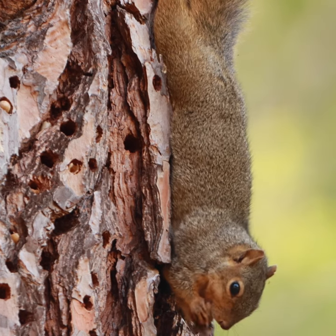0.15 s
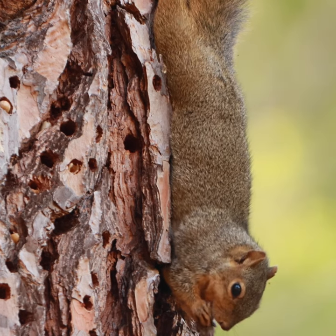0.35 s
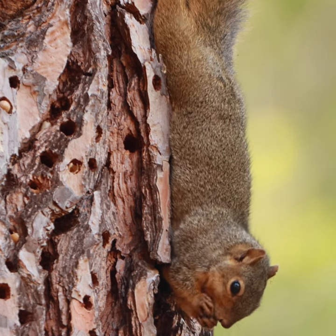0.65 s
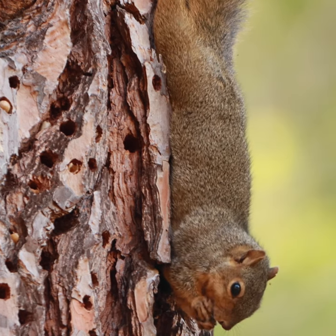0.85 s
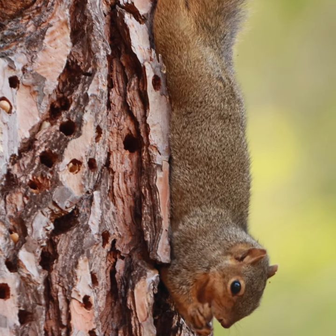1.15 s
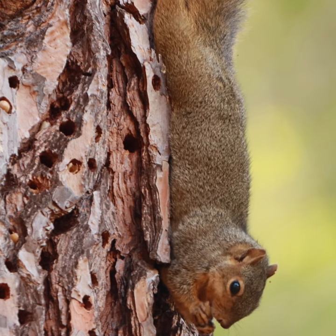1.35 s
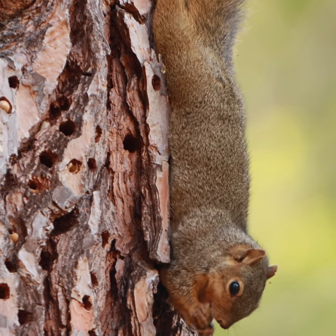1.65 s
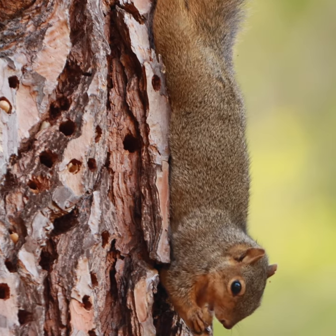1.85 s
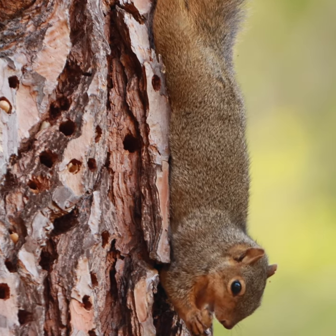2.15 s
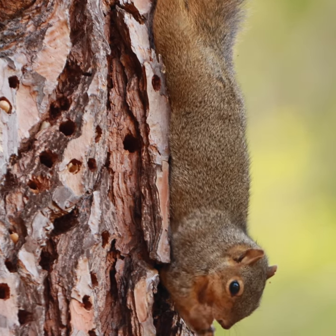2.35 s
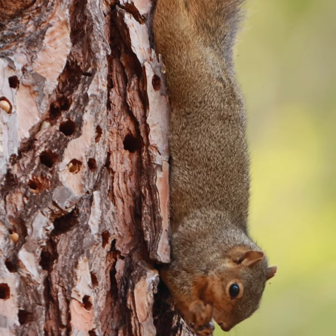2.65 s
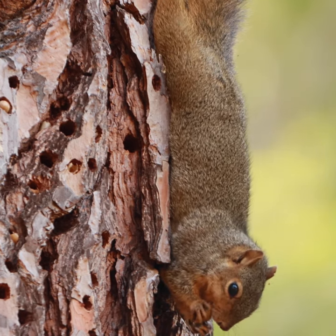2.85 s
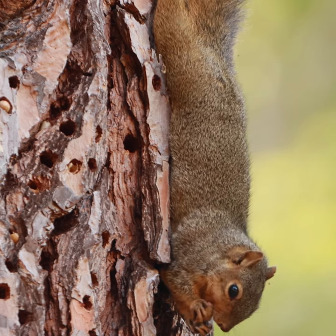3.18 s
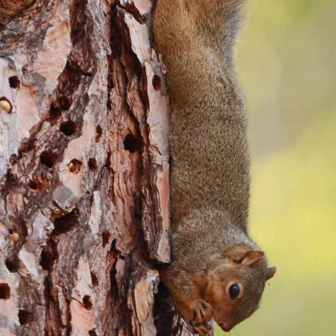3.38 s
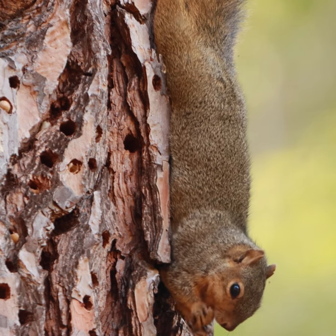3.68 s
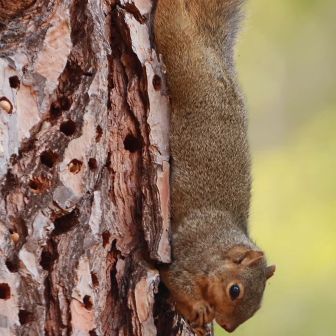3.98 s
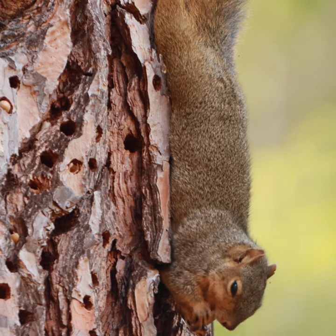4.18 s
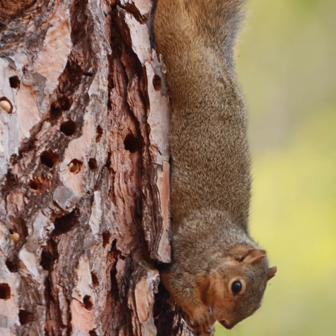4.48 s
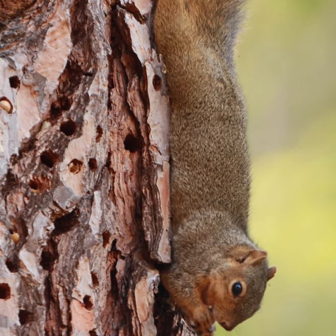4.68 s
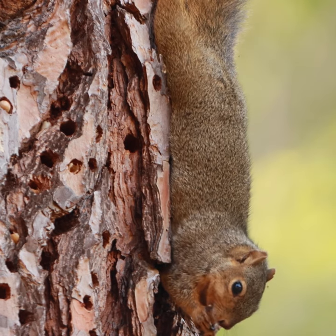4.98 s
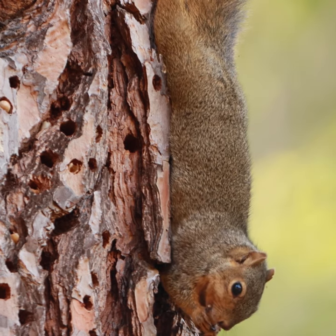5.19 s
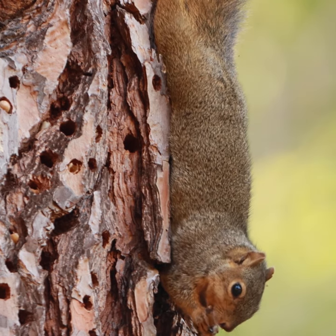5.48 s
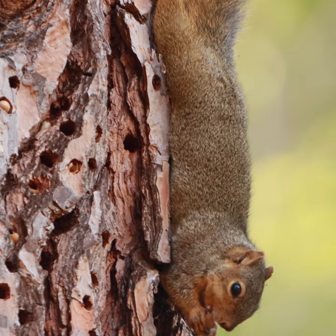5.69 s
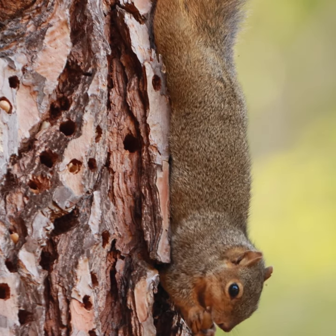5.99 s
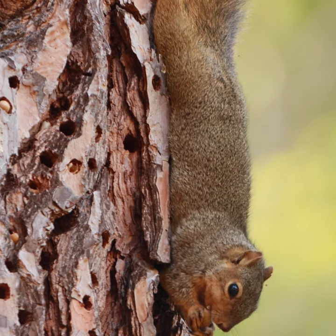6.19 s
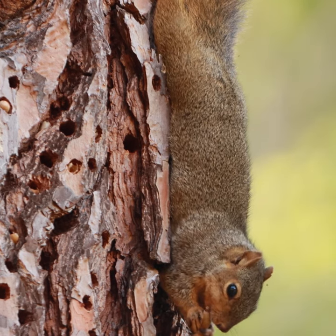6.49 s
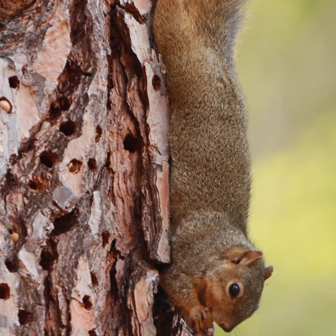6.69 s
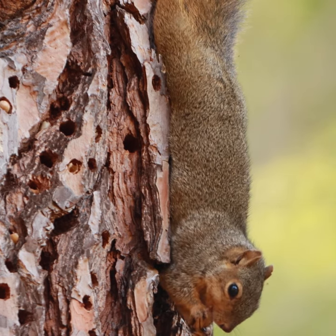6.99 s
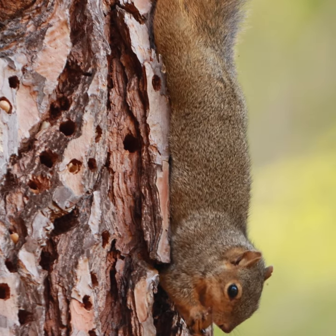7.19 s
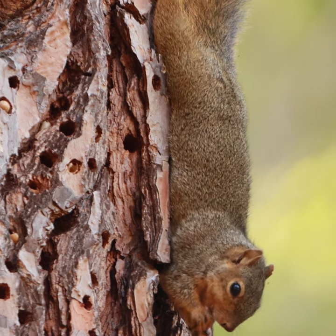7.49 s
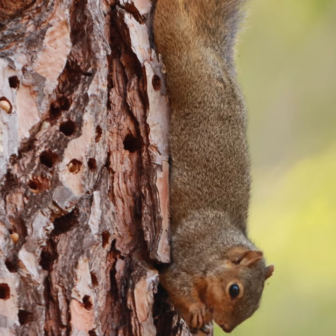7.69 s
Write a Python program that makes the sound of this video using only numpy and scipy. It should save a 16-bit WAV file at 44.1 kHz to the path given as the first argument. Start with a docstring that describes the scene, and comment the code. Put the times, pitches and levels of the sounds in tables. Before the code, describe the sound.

A soft distant rumble, slowly swelling, and a light hiss of air last the whole eight seconds. A cricket makes faint, high, pure-toned triple-pulse chirps at 0.1-0.4 s, steadily from 0.65 to 2.8 s, once at 4.5 s and again from 5.75 to 6.5 s. A far woodpecker gives gentle echoing churrs, runs of seven reedy notes rising then sinking, around 0.9, 1.8, 3.1, 4.3 and 5.5 s, the later four followed by quick double notes. A near woodpecker, far louder, scolds at 3.4-3.7 s, then at 4.6, 5.05 and 5.35 s, and finally at 6.8-7.1 s: harsh, fast-trilled, climbing churrs with short raspy yelps around them and woodland reverberation. Faint dry bark ticks fall at 4.05 s and scattered from 6 to 7.5 s; one short dull knock sounds at 6.25 s. The end settles into rumble and air.

```python
"""A cricket chirps faintly in bouts of pure-tone wing strokes over a low far rumble and a hiss of air.
From about 1 s a far woodpecker gives slow churrs, each an arched run of reedy notes in echo.
From 3.4 s a near one scolds: five harsh rolling churrs, reedy harmonics that climb while they trill,
with short yelps around them. From 4 s a few noise-burst ticks of bark fall; at 6.2 s a dull knock,
a quickly damped sine, sounds once."""
import sys
import numpy as np
from scipy import signal
from scipy.fft import rfft, irfft, next_fast_len
from scipy.io import wavfile

SR = 44100
rng = np.random.default_rng(int(sys.argv[2]) if len(sys.argv) > 2 else 0)


def master_out(mix):
    """Clip the mix to full scale and print it as 16-bit PCM to the path in sys.argv[1]."""
    frames = np.transpose(np.atleast_2d(mix))
    ceiling = np.clip(frames, -1, 1)
    pcm = np.round(ceiling * 32767).astype(np.int16)
    wavfile.write(sys.argv[1], SR, pcm)


N = 345744
TIME = np.arange(N) / SR
CUTOFF_HZ = 15600


def from_db(db):
    """Amplitude factor of a level in dB."""
    return 10 ** (np.asarray(db) / 20)


def rms_one(x):
    """Scale to rms 1."""
    return x / np.sqrt(np.mean(x ** 2) + 1e-20)


def in_time(rows, t):
    """Each column of a curve, interpolated at times t."""
    s, *columns = np.transpose(rows)
    return [np.interp(t, s, column) for column in columns]


def at_hz(points, hz, axis=1):
    """One column of a spectrum, interpolated over log frequency."""
    points = np.array(points)
    return np.interp(np.log(np.maximum(hz, 1)), np.log(points[:, 0]), points[:, axis])


def shaped(x, response):
    """Filter x by a response given as a function of frequency."""
    size = next_fast_len(x.shape[-1] + SR // 10)
    hz = np.arange(size // 2 + 1) * SR / size
    return irfft(rfft(x, size) * response(hz), size)[..., :x.shape[-1]]


def coloured(x, spectrum):
    """Filter x by a table of f/Hz, level/dB."""
    return shaped(x, lambda hz: from_db(at_hz(spectrum, hz)))


def wobble(size, rate_hz):
    """Random wavering up to about rate_hz; rms 1."""
    return rms_one(shaped(rng.standard_normal(size), lambda hz: 1 / (1 + (hz / rate_hz) ** 2)))


def add(track, t, sound):
    """Mix a sound into a track from time t[0] on."""
    start = int(round(t[0] * SR))
    track[start:start + len(sound)] += sound[:N - start]


def near_bird():
    """Churrs and yelps pass through the same throat and bill and echo among the trees."""
    # throat and bill resonances: f/Hz, relative level/dB
    throat_spectrum = [(700, -22.5), (1000, -13.5), (1450, -5), (1800, 0), (2200, 3.5), (2850, -5),
                       (3600, 3), (4200, -15), (4800, -17.5), (5700, -12), (6900, -24), (8300, -27.5),
                       (9900, -40.5), (11500, -23), (12700, -29.5), (14200, -45)]
    # churrs: start/s, summit/s, end/s, start pitch/Hz, summit pitch/Hz, level/dB, trill rate/Hz,
    # full trill pitch swing/share, trill loudness swing/dB, summit roughness/0-1,
    # summit bill opening/dB, third-harmonic lift/dB
    churr_rows = [(3.45, 3.561, 3.606, 654.5, 716, -30.5, 35.5, 0.051, 2.5, .03, -6.5, 1.5),
                  (4.634, 4.801, 4.928, 600, 922.5, -27, 37, 0.0644, 1, 0.15, 7.5, 2.5),
                  (5.06, 5.149, 5.195, 662.5, 776.5, -27, 37.3, 0.061, 2.6, 0.03, -0.5, 3),
                  (5.354, 5.446, 5.527, 648.4, 754, -28.5, 36.5, 0.076, 3, 0.1, -1, 2),
                  (6.796, 6.989, 7.083, 606.5, 882, -29, 37.4, 0.078, 1.5, 0.19, 3.5, 4.5)]
    # yelps leading into or trailing a churr: middle/s, length/s, top pitch/Hz, level/dB,
    # roughness/0-1, bill opening/dB
    yelp_rows = [(3.398, 0.061, 634, -37, 0.54, -6.5), (3.437, 0.04, 610, -34.5, 0.5, -6),
                 (3.621, 0.039, 680, -33.5, 0.46, 2.5), (3.651, .032, 695, -34.5, 0.53, 1),
                 (3.685, 0.033, 680, -42, .5, -1), (4.613, 0.05, 596, -33, 0.13, -12),
                 (5.041, .034, 625, -29.5, 0.38, -11), (5.21, 0.041, 751, -33, 0.7, 0.5),
                 (5.34, 0.04, 665, -31.5, 0.56, -4.5), (6.767, 0.044, 602, -32, 0.15, -12)]
    # t/s, echo send level/dB, top treble gain/dB
    echo_and_treble = [(3.4, -13.5, -1), (3.65, -14.5, 8.5), (4.62, -20, -7.5), (4.76, -11.5, 6.5),
                       (4.9, -15, 1), (5.1, -14.5, -3), (5.43, -15, 6.5), (5.53, -13.5, 4),
                       (6.82, -12.5, -7), (6.95, -16.5, 0), (7.06, -10.5, -4)]
    direct, sent = np.zeros(N), np.zeros(N)
    calls = [churr(*row) for row in churr_rows] + [yelp(*row) for row in yelp_rows]
    for t, pitch_hz, loudness, rough, open_db, third_db in calls:
        echo_db, treble_db = in_time(echo_and_treble, t)
        voice = syrinx(pitch_hz, np.clip(rough, 0, 1), throat_spectrum, third_db)
        call = loudness * bill(voice, open_db, treble_db)
        add(direct, t, call)
        add(sent, t, call * from_db(echo_db))
    return from_the_side(direct + trees(sent))


def churr(start, summit, end, start_hz, top_hz, db, rate_hz, swing, throb_db, top_rough, top_open_db,
          third_db, end_hz=671, loud_lag_s=0.0058, arch=0.064, unevenness=0.00803,
          trill_from_hz=520, trill_full_hz=760, edge_s=0.0041):
    """One trilled pitch arch: times, pitch, loudness, roughness, bill opening, third harmonic."""
    rise_power, fall_power = 1.9, 2.7  # higher: flatter summit
    start_db, end_db, fade_power = -5, -4, 5.6  # relative to the summit
    start_rough, end_rough = 0.08, 0.16
    bill_db_per_hz = 0.045
    t = TIME[int(start * SR):int(end * SR)]
    before = np.clip((summit - t) / (summit - start), 0, 1)
    after = np.clip((t - summit) / (end - summit), 0, 1)

    rise = (start_hz - top_hz) * before ** rise_power
    fall = (end_hz - top_hz) * after ** fall_power
    arch_hz = top_hz + rise + fall
    level_db = db + start_db * before ** fade_power + end_db * after ** fade_power
    rough = top_rough + (start_rough - top_rough) * before + (end_rough - top_rough) * after ** 2
    open_db = top_open_db - bill_db_per_hz * (top_hz - arch_hz)

    turn = 2 * np.pi * rate_hz * (t - summit)
    trill = np.cos(turn) - arch * np.cos(2 * turn)  # round crests, sharp troughs
    # the trill widens as the voice climbs
    effort = np.clip((arch_hz - trill_from_hz) / (trill_full_hz - trill_from_hz), 0, 1)
    pitch_hz = arch_hz * (1 + effort * swing * trill + unevenness * wobble(len(t), 62))
    throb = throb_db * np.cos(turn - 2 * np.pi * rate_hz * loud_lag_s)
    edges = np.minimum(1, np.minimum(t - t[0], t[-1] - t) / edge_s)  # soft start and stop
    return t, pitch_hz, from_db(level_db + throb) * edges, rough, open_db, third_db


def yelp(s, length_s, top_hz, db, rough, open_db, third_db=-2, droop=0.1746):
    """One short arched note, lower by the share droop at both ends; same controls as a churr."""
    t = TIME[int((s - length_s / 2) * SR):int((s + length_s / 2) * SR)]
    away = np.linspace(-1, 1, len(t)) ** 2
    return t, top_hz * (1 - droop * away), from_db(db) * (1 - away), rough, open_db, third_db


def syrinx(pitch_hz, rough, throat, third_db=0, jitter=0.0044, rough_jitter=0.0484, jitter_hz=450,
           shimmer=0.59, rasp=1.0, flutter_db=2, flutter_hz=70, air_db=-23, air_hz=7000):
    """Reedy harmonics shaped by the throat; roughness shakes the cycles and adds pulsed rasp."""
    size = len(pitch_hz)
    shaky_hz = pitch_hz * (1 + (jitter + rough_jitter * rough) * wobble(size, jitter_hz))
    phase = 2 * np.pi * np.cumsum(shaky_hz) / SR

    k = np.arange(1, 25)[:, None]  # harmonic numbers
    flutter = flutter_db * wobble((len(k), size), flutter_hz)  # each harmonic wavers by itself
    gains = from_db(at_hz(throat, k * pitch_hz) + flutter + third_db * (k == 3))
    gains = gains * (k * pitch_hz < CUTOFF_HZ)
    harmonics = gains * np.sin(k * phase + rng.uniform(0, 2 * np.pi, k.shape))
    tone = harmonics.sum(0) / np.sqrt((gains ** 2).sum(0) / 2)
    tone = tone * (1 + shimmer * rough * wobble(size, jitter_hz))

    pulsed_noise = rng.standard_normal(size) * (1 + np.cos(phase))
    hiss = rms_one(coloured(pulsed_noise, throat))
    # a fine rasp rides on top even of clear notes
    fine = rms_one(shaped(hiss, lambda hz: 1 - 1 / (1 + (hz / air_hz) ** 8)))
    voice = (tone + rasp * rough * hiss) / np.sqrt(1 + (rasp * rough) ** 2)
    return voice + from_db(air_db) * fine


def bill(voice, open_db, treble_db, bill_hz=3690, width_hz=620, treble_hz=9600):
    """The bill's opening sets the upper resonance, its direction the top treble."""
    upper = shaped(voice, lambda hz: np.exp(-((hz - bill_hz) / width_hz) ** 2))
    treble = shaped(voice, lambda hz: 1 - 1 / (1 + (hz / treble_hz) ** 10))
    return voice + (from_db(open_db) - 1) * upper + (from_db(treble_db) - 1) * treble


def trees(x, early_s=0.017, late_db=-2, t60_s=0.61, first_s=0.0065, alike=0.36):
    """Near trunks give separate quick echoes, the wood behind them a diffuse tail."""
    # colour of the echo: f/Hz, gain/dB
    echo_colour = [(700, 7), (2200, 3.5), (2900, 2), (3600, 5.5), (4500, 6.5), (5700, 8), (9000, 10),
                   (12000, 1.5)]
    t = TIME[:SR]
    hits = rng.standard_normal((3, SR)) * (rng.random(SR) < 900 / SR)  # about 900 per s
    trunks = hits * np.exp(-t / early_s) * (t > first_s)
    wood = rng.standard_normal((3, SR)) * from_db(-60 * t / t60_s) * (1 - np.exp(-t / early_s))
    paths = (rms_one(trunks) + from_db(late_db) * rms_one(wood)) / np.sqrt(SR)
    # one path common to both sides, one for each
    paths = np.sqrt(alike) * paths[0] + np.sqrt(1 - alike) * paths[1:]
    return signal.fftconvolve(np.atleast_2d(x), coloured(paths, echo_colour), axes=1)[:, :N]


def from_the_side(x):
    """Sound from the birds' side reaches the left port a little later, with its own colour."""
    # port differences: f/Hz, left phase lag/rad, left-right level/dB
    port_rows = [(800, 0.47, 2), (1630, 0.73, -0.5), (2100, 0.45, -1.5), (3070, 0.76, 5), (3760, 1.99, 1.5),
                 (6200, 2.08, 1.5), (8160, 4.7, 1.5), (12200, 6.3, -1)]

    def ports(hz):
        half_gain = from_db(at_hz(port_rows, hz, axis=2) / 2)
        half = half_gain * np.exp(-0.5j * at_hz(port_rows, hz))
        return np.array([half, 1 / half])
    return shaped(x, ports)


def far_bird(level_db=2, half_s=0.015, droop=0.251, rough=0.04, echo_db=-7,
             third_db_per_hz=0.07, third_from_hz=780):
    """Slower churrs of separate notes, each an arch of pitch, with the echoes of the wood."""
    # voice after the way through the trees: f/Hz, relative level/dB
    far_throat = [(800, -20.5), (1300, -1), (1650, 0.5), (2200, 4.5), (2700, -11), (3100, 2.5), (3500, 2.5),
                  (4000, -11), (5600, -21), (8000, -46), (14000, -71)]
    out = np.zeros(N)
    for s, top_hz, db in far_notes():
        t = TIME[int((s - half_s) * SR):int((s + half_s) * SR)]
        away = np.linspace(-1, 1, len(t)) ** 2
        third_db = third_db_per_hz * max(0, third_from_hz - top_hz)  # stronger in low notes
        voice = syrinx(top_hz * (1 - droop * away), rough, far_throat, third_db)
        add(out, t, from_db(db + level_db) * np.sqrt(1 - away) * voice)
    return from_the_side(out + from_db(echo_db) * trees(out, early_s=0.051, late_db=-2, t60_s=0.73))


def far_notes(note_count=7, uneven_db=1.7, lead_s=0.014, summit=0.62, sag=0.62, fade_db=-18):
    """Notes as (s, top pitch Hz, relative dB): runs that climb, swell and sink, then level pairs."""
    # churrs: middle note/s, note spacing/s, summit pitch/Hz, relative level/dB
    far_churrs = [(.933, 0.037, 853, -51), (1.845, 0.035, 889, -49), (3.078, .0337, 897, -48.5),
                  (4.322, .0353, 893, -50), (5.492, 0.046, 905, -49)]
    # double notes after a churr: t/s, spacing/s, top pitch/Hz, relative level/dB
    far_pairs = [(2.07, .043, 780, -53.5), (3.303, .034, 800, -54.5), (4.533, 0.05, 781, -51),
                 (5.696, 0.047, 825, -51.5)]
    notes = []
    for middle, gap, top_hz, db in far_churrs:
        for k in range(note_count):
            away = (k / (note_count - 1) - summit) ** 2  # summit as a share of the run
            s = middle + (k - note_count // 2) * gap - lead_s * (k == 0)  # first note stands apart
            note_db = db + fade_db * away + uneven_db * rng.standard_normal()
            notes.append((s, top_hz * (1 - sag * away), note_db))
    pairs = [(s + k * gap, top_hz, db) for s, gap, top_hz, db in far_pairs for k in range(2)]
    return notes + pairs


def cricket(pitch_hz=4080, stroke_count=3, stroke_s=0.021, half_s=0.0074, sag=0.008, growth_db=1.7,
            climb_hz=12, uneven_hz=14, uneven_db=0.6, echo_db=-18):
    """Chirps of short sagging pure tones, one a wing stroke, on average rising in level and pitch."""
    # bouts: start/s, chirp count, chirp spacing/s, first-stroke level/dB
    bouts = [(.125, 2, .248, -56), (.652, 10, .2346, -54.5), (4.503, 1, .23, -54.5), (5.75, 4, .219, -54)]
    out = np.zeros(N)
    chirps = [(s + i * gap, db) for s, count, gap, db in bouts for i in range(int(round(count)))]
    for s, db in chirps:
        for k, (off_pitch, off_level) in enumerate(rng.standard_normal((stroke_count, 2))):
            middle = s + k * stroke_s
            t = TIME[int((middle - half_s) * SR):int((middle + half_s) * SR)]
            along = np.linspace(-1, 1, len(t))
            stroke_hz = (pitch_hz + climb_hz * k + uneven_hz * off_pitch) * (1 - sag * along)
            tone = np.sin(2 * np.pi * np.cumsum(stroke_hz) / SR)
            level = from_db(db + growth_db * k + uneven_db * off_level)
            add(out, t, level * np.cos(along * np.pi / 2) * tone)
    return out + from_db(echo_db) * trees(out)


def knock(start_s=6.247, level_db=-16, ring_hz=680, t60_s=0.003, soft_hz=1100):
    """One damped sine, dead within a few cycles and dulled by a low-pass."""
    t = np.maximum(TIME - start_s, 0)
    decay_db = np.minimum(60 * t / t60_s, 200)
    ring = -np.sin(2 * np.pi * ring_hz * t) * from_db(level_db - decay_db)
    return signal.sosfilt(signal.butter(4, soft_hz, fs=SR, output="sos"), ring)


def bark_ticks(level_db=-6, t60_s=0.0099, low_hz=2200):
    """Tiny dry snaps: high-passed noise that decays within milliseconds."""
    # t/s, relative level/dB
    ticks = [(4.0485, -50), (6.04, -55), (6.2494, -48), (6.4714, -54), (6.6094, -47), (7.2794, -48),
             (7.4544, -47)]
    out, t = np.zeros(N), TIME[:SR // 20]
    for s, db in ticks:
        decay = from_db(db + level_db - 60 * t / t60_s)
        add(out, s + t, decay * rng.standard_normal(len(t)))
    return signal.sosfilt(signal.butter(2, low_hz, "high", fs=SR, output="sos"), out)


def background(deep_hz=130, upper_hz=280, uneven_db=0.07, lag_s=0.00016, pan_db=2.5,
               air_db=-53, air_pan_db=1):
    """A far rumble swells slowly in three registers, under a soft hiss of air in the leaves."""
    # f/Hz, relative density/dB
    rumble_spectrum = [(16, -49), (28, -10), (46, -7.5), (64, 0.5), (113, -4), (139, -9), (173, -5),
                       (194, 1.5), (229, -3.5), (257, -4.5), (296, -12), (346, -8.5), (453, -20.5),
                       (600, -23), (780, -34.5), (1320, -120)]
    # f/Hz, relative density/dB
    air_spectrum = [(300, -15.5), (480, 1), (1000, -1), (2100, -2), (2700, -8), (4000, -10), (5000, -14),
                    (9000, -22), (13000, -24), (15500, -30)]
    # slow swell of the rumble: t/s, deep level/dB, middle level/dB, upper level/dB
    swell = [(0.0, -53, -47.0, -56.0), (1.7, -51, -46.5, -54.5), (2.4, -51, -47.5, -59.5),
             (3.6, -53, -46.5, -58.5), (4.5, -51, -48, -53), (5.05, -51.5, -46.0, -49),
             (5.35, -48.5, -54.5, -51.5), (5.65, -46.5, -50, -60.5), (6.15, -48.5, -53.5, -55.0),
             (6.5, -50, -54, -56), (7.4, -55, -52.5, -55.5), (7.84, -52.5, -47.5, -59.5)]
    rumble = wide_noise(rumble_spectrum)
    deep = shaped(rumble, lambda hz: 1 / (1 + (hz / deep_hz) ** 10))
    upper = shaped(rumble, lambda hz: 1 - 1 / (1 + (hz / upper_hz) ** 10))
    low = np.zeros((2, N))
    for part, level_db in zip([deep, rumble - deep - upper, upper], in_time(swell, TIME)):
        low += rms_one(part) * from_db(level_db + uneven_db * wobble(N, 16.0))
    low = np.array([np.interp(TIME - lag_s, TIME, low[0]), low[1]])  # left port hears it later
    air = wide_noise(air_spectrum) * from_db(air_db)
    low_pan = from_db([[pan_db / 2], [-pan_db / 2]])
    air_pan = from_db([[air_pan_db / 2], [-air_pan_db / 2]])
    return low * low_pan + air * air_pan


def wide_noise(spectrum):
    """Stereo noise, alike on both sides in the bass and less so in the treble; rms 1."""
    # f/Hz, left-right correlation
    likeness = [(60, 0.95), (220, 0.92), (500, 0.55), (1500, 0.06), (4000, 0.033), (12000, 0.1)]

    def alike(hz):
        return np.clip(at_hz(likeness, hz), -1, 1)
    mid, side = coloured(rng.standard_normal((2, N)), spectrum)
    mid = shaped(mid, lambda hz: np.sqrt(1 + alike(hz)))
    side = shaped(side, lambda hz: np.sqrt(1 - alike(hz)))
    return rms_one(np.array([mid + side, mid - side]))


def scene():
    """Both birds, the cricket and the small sounds over the background."""
    return near_bird() + far_bird() + cricket() + knock() + bark_ticks() + background()


def record(dry, bass_cut_hz=48):
    """The deepest bass rolls off and the top is cut steeply."""
    thinned = signal.sosfilt(signal.butter(3, bass_cut_hz, "high", fs=SR, output="sos"), dry)
    return signal.sosfilt(signal.ellip(10, 0.1, 80, CUTOFF_HZ, fs=SR, output="sos"), thinned)


dry = scene()
out = record(dry)
master_out(out)
```